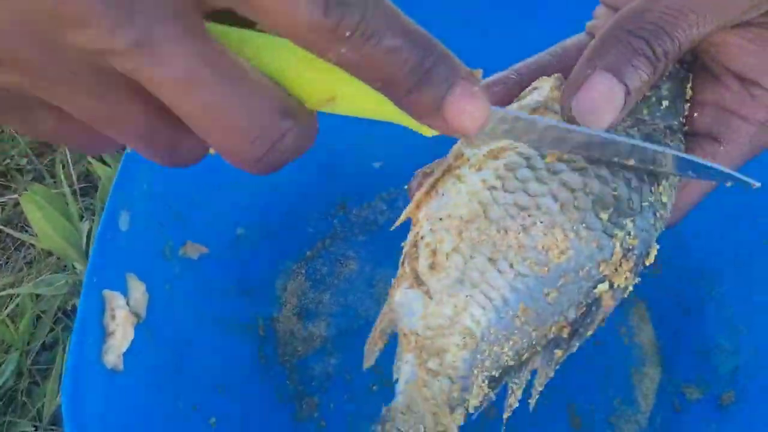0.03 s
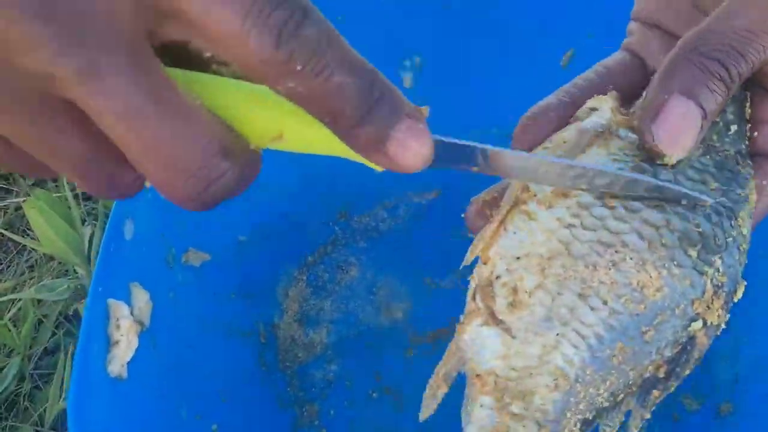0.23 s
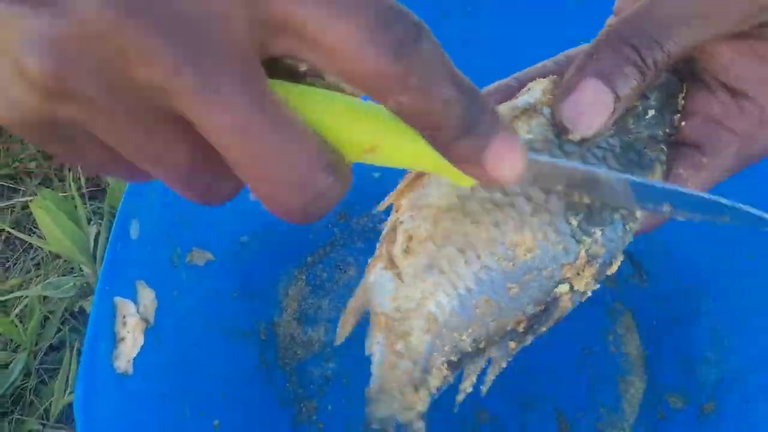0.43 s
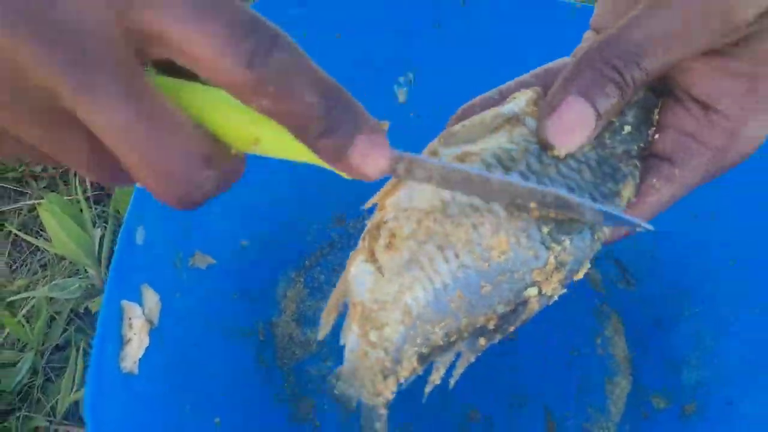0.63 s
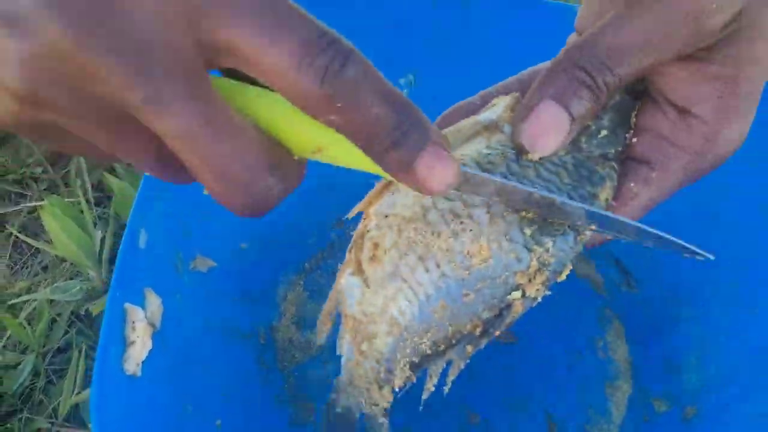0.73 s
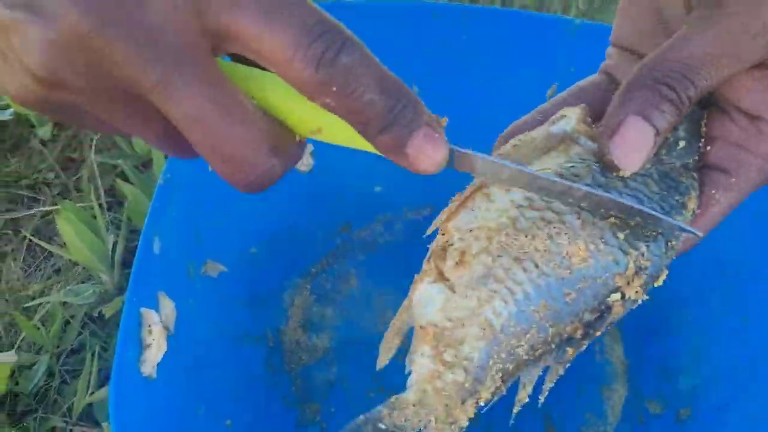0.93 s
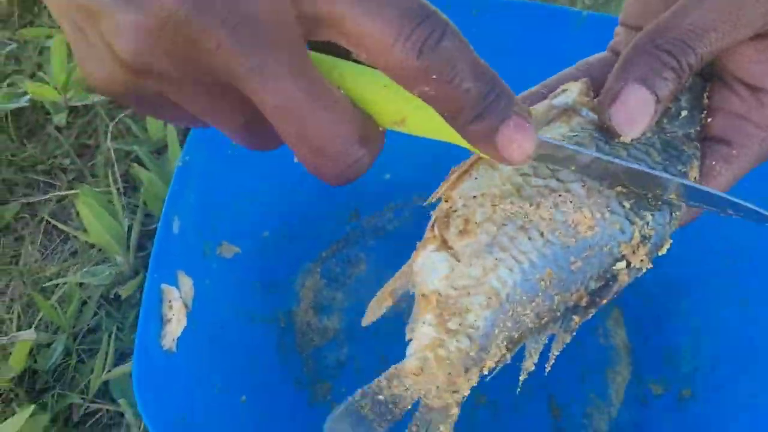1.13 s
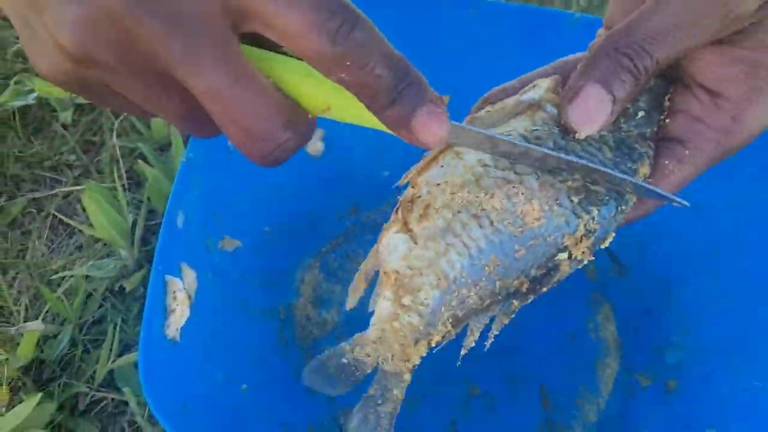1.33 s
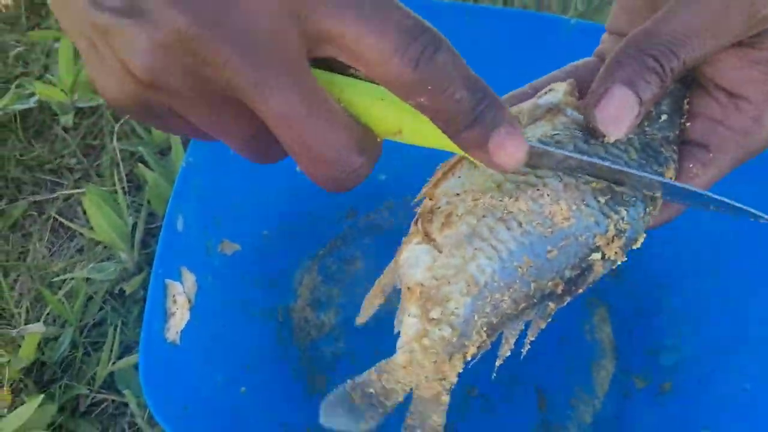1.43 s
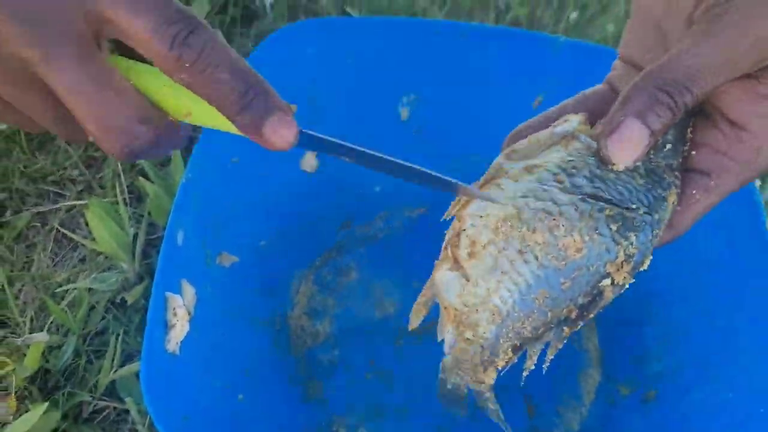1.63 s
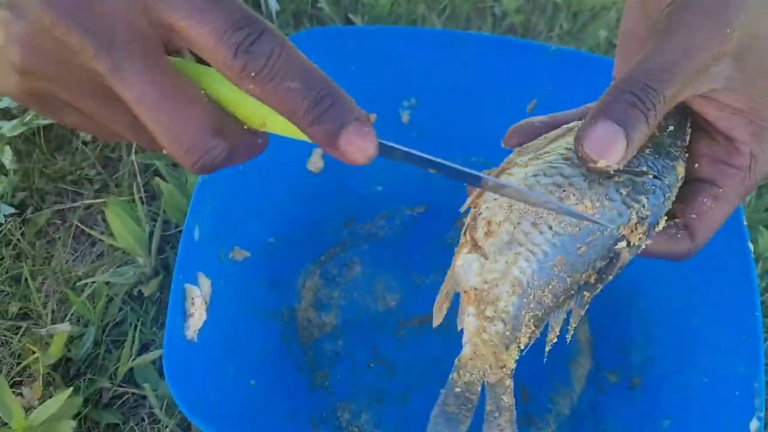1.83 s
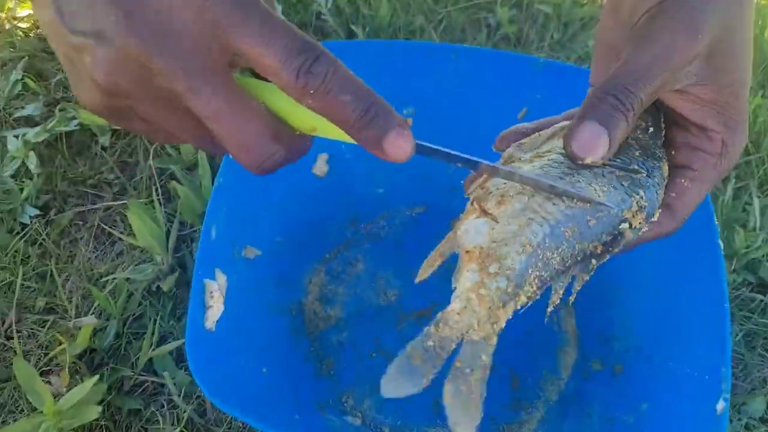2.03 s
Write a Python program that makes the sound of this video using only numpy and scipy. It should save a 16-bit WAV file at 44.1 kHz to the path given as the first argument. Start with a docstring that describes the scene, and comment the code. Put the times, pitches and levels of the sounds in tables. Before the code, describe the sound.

A knife blade scrapes scales from a fish over a plastic bowl, a few light strokes and then firmer, quicker ones, close to the microphone outdoors, with wind thumping low and a faint distant bird.

```python
"""A knife scrapes the scales off a fish held over a plastic bowl outdoors: a few light strokes, then a run of firm ones.
Uneven clicks of the edge drive resonances of fish, blade and bowl: a hollow rasp, a thin steel ring and a fine crackle.
The blade catches now and then, a narrow ring at one pitch, and single scales snap off as short bursts of bright noise.
Close on the microphone, wind buffets its two ports: shaped noise for rumble and flutter, short low swings for thumps.
Behind lie a faint hiss of shaped noise and a far bird, whose chirps are wavering sines."""
import sys
import numpy as np
from scipy import signal
from scipy.fft import rfft, irfft
from scipy.io import wavfile
from scipy.ndimage import uniform_filter1d

SR = 44100
rng = np.random.default_rng(int(sys.argv[2]) if len(sys.argv) > 2 else 0)


def store_pcm(level_fs):
    """Save levels as 16-bit WAV."""
    pcm = np.round(np.clip(level_fs, -1, 1) * 32767).astype(np.int16)
    wavfile.write(sys.argv[1], SR, np.atleast_2d(pcm).T)


N = 91904
TIME = np.arange(N) / SR
BIN_HZ = np.arange(N // 2 + 1) * SR / N
OPPOSITE = np.array([[1], [-1]])  # a part that enters left and right with opposite sign


def from_db(db):
    """Decibels to gain."""
    return 10 ** (np.asarray(db) / 20)


def rms_one(x):
    """Scale to unit power."""
    return x / np.sqrt(np.mean(x ** 2) + 1e-20)


def in_time(rows):
    """The level of a (time, level) curve at every sample."""
    s, level = np.transpose(rows)
    return np.interp(TIME, s, level)


def bump(s, width_s):
    """A smooth Gaussian swell around time s; width_s is its standard deviation."""
    return np.exp(-.5 * ((TIME - s) / width_s) ** 2)


def panned(x, pan_db):
    """Left louder than right by pan_db."""
    return x * from_db(np.array([[.5], [-.5]]) * pan_db)


def spread(x, pans):
    """Left against right by frequency."""
    hz, pan_db = np.transpose(pans)
    return irfft(panned(rfft(x), np.interp(BIN_HZ, hz, pan_db)), N)


def coloured(x, spectrum):
    """Weight a signal by a spectrum drawn over log frequency; unit power."""
    hz, db = np.transpose(spectrum)
    log_bins = np.log(np.maximum(BIN_HZ, 1))
    gain = from_db(np.interp(log_bins, np.log(hz), db))
    return rms_one(irfft(rfft(x) * gain, N))


def drift(rate):
    """Random wander with spread 1, mostly slower than rate [Hz]."""
    return coloured(rng.standard_normal(N), [(rate / 2, 0), (rate, -3), (rate * 10, -60)])


def evened(x, seconds):
    """Hold the short-term power near one."""
    power = x ** 2
    for _ in range(2):
        power = uniform_filter1d(power, max(int(seconds * SR), 2))
    return x / np.sqrt(np.maximum(power, 0) + 1e-9)


def resonance(x, hz, width_hz):
    """Two-pole resonance with gain 1 on top."""
    r = np.exp(-np.pi * width_hz / SR)
    feed = np.array([1, 0, -1]) * (1 - r * r) / 2
    back = [1, -2 * r * np.cos(2 * np.pi * hz / SR), r * r]
    return signal.lfilter(feed, back, x + 1e-18)


def wind():
    """Each port has its own eddies: a deep rumble, and a flutter above it in the harder gusts."""
    # rumble at the left and at the right port, before the trim: (time [s], level [dB])
    left_gusts = [(0.0, -38), (0.15, -28.5), (0.18, -53.5), (0.3, -82), (0.35, -49.5), (0.39, -52.5),
                  (0.46, -29), (0.49, -65), (0.54, -38.5), (0.67, -42), (0.77, -35.5), (0.86, -62),
                  (0.93, -41), (1.03, -29.5), (1.06, -68), (1.12, -27.5), (1.17, -79), (1.32, -61.5),
                  (1.38, -36.5), (1.6, -47.5), (1.7, -78), (1.82, -45), (1.95, -62), (1.98, -35),
                  (2.08, -49)]
    right_gusts = [(0.0, -38), (0.02, -26), (0.1, -42), (0.15, -34), (0.3, -48.5), (0.34, -42.5),
                   (0.39, -71), (0.45, -24), (0.47, -43.5), (0.53, -31.5), (0.58, -39.5), (0.69, -47),
                   (0.76, -30), (0.9, -45), (1.04, -30), (1.07, -42), (1.16, -41.5), (1.32, -49.5),
                   (1.44, -40.5), (1.53, -41.5), (1.72, -58.5), (1.83, -43.5), (1.96, -76), (1.99, -36),
                   (2.08, -48.5)]
    # flutter before it is panned: (time [s], level [dB])
    flutter_level = [(0.0, -34.5), (0.035, -40), (0.07, -49), (0.125, -35.5), (0.155, -38), (0.19, -70),
                     (0.23, -47.5), (0.28, -74), (0.335, -59.5), (0.40, -84), (0.45, -60), (0.497, -45),
                     (0.61, -57.5), (0.625, -45), (0.68, -63.5), (0.81, -42.5), (0.865, -65.5),
                     (1.03, -39.5), (1.07, -50), (1.13, -52), (1.3, -70), (1.39, -55.5), (1.7, -69),
                     (2.08, -63.5)]
    # spectra of rumble and flutter: (frequency [Hz], relative density [dB per Hz])
    rumble_colour = [(15, -28), (30, -8.5), (48, -3.5), (68, 2), (110, -9), (160, -9.5), (230, -39),
                     (500, -62)]
    flutter_colour = [(100, -57), (170, -5.5), (245, 2.5), (320, -3.5), (420, -10.5), (560, -22),
                      (800, -35.5), (1500, -53)]
    rumble_trim_db, rumble_top_hz, flutter_pan_db = -2.5, 197, -1.5
    steady_s = 0.022  # averaging time over which the power is held even

    rumble_db = rumble_trim_db + np.array([in_time(left_gusts), in_time(right_gusts)])
    rumble_noise = coloured(rng.standard_normal((2, N)), rumble_colour)
    rumble = from_db(rumble_db) * evened(rumble_noise, steady_s)
    lowpass = signal.butter(3, rumble_top_hz, fs=SR, output="sos")

    flutter_noise = coloured(rng.standard_normal((2, N)), flutter_colour)
    flutter = from_db(in_time(flutter_level)) * evened(flutter_noise, steady_s)
    return signal.sosfilt(lowpass, rumble) + panned(flutter, flutter_pan_db)


def hiss():
    """Faint outdoor noise, stronger on the right and most so below the top octave; its treble swells softly twice."""
    # spectrum: (frequency [Hz], relative density [dB per Hz])
    hiss_colour = [(100, 3.5), (500, 6), (700, -0.5), (1050, -0.5), (1700, 2), (3000, 1), (5000, 0.5),
                   (7200, 4), (8500, -6), (11000, 1.5), (13500, -2.5), (15500, -4)]
    # level before the balance: (time [s], level [dB])
    hiss_level = [(0.14, -59.5), (0.26, -64.5), (0.6, -62), (2.08, -62.5)]
    # balance: (frequency [Hz], left minus right [dB])
    balance = [(6000, -7.5), (12000, -2)]
    # treble swells: (time [s], standard deviation [s], level [dB])
    shimmers = [(0.588, 0.037, -72), (0.832, 0.074, -67)]
    shimmer_hz, shimmer_width_hz = 11100, 640

    even = from_db(in_time(hiss_level)) * coloured(rng.standard_normal((2, N)), hiss_colour)
    treble = rms_one(resonance(rng.standard_normal((2, N)), shimmer_hz, shimmer_width_hz))
    swells = sum(from_db(db) * bump(s, width_s) for s, width_s, db in shimmers)
    return spread(even, balance) + treble * swells


def thumps():
    """A hard eddy strikes the ports with a short low swing, not quite in step on the two sides."""
    # before the lowpass: (time [s], envelope peak [dB], frequency [Hz], left minus right [dB])
    eddies = [(0.005, -30.5, 159, -2.5), (0.030, -26, 241, -2), (0.117, -24.5, 83.4, -7),
              (0.493, -41, 322, 0), (0.626, -27, 69, -5), (0.798, -33, 73, -15), (0.818, -27, 80, -7.5),
              (1.018, -27, 251.5, -2.5), (1.099, -27.5, 63, -12), (1.917, -28, 82.5, 4)]
    rise_s, top_hz = 0.005, 630
    out = np.zeros((2, N))
    for s, db, hz, pan_db in eddies:
        age = np.maximum(TIME - s, 0)
        phase_lag = np.array([[0], [rng.uniform(1, 1.72)]])  # radians, left and right
        swing = np.sin(2 * np.pi * hz * age - phase_lag)
        envelope = age / rise_s * np.exp(1 - age / rise_s)
        out += panned(from_db(db) * swing * envelope, pan_db)
    return signal.sosfilt(signal.butter(2, top_hz, fs=SR, output="sos"), out)


def bird():
    """Faint far chirps, sines that sag in pitch: one thin, the others roughened by a fast waver."""
    # (time [s], standard deviation [s], pitch [Hz], waver [share of pitch], level [dB])
    chirps = [(0.046, 0.012, 2855, 0.083, -62.5), (0.343, 0.025, 4205, 0.0134, -70.5),
              (0.685, 0.011, 2910, .1, -64.5), (1.256, 0.0053, 2750, .06, -60)]
    fall_hz, waver_hz = 50, 260  # fall per standard deviation of time; rate of the waver
    out = 0
    for s, width_s, hz, waver, db in chirps:
        sag = fall_hz * np.clip((TIME - s) / width_s, -2, 2)
        pitch = hz * (1 + waver * drift(waver_hz)) - sag
        out = out + from_db(db) * bump(s, width_s) * np.sin(2 * np.pi * np.cumsum(pitch) / SR)
    return out


def scale_clicks():
    """The edge flicks over scale after scale: dense uneven clicks over smooth friction."""
    scales_per_s, spread_db = 1000, 2.6
    click_share = 0.7  # of the power; the rest is friction
    sizes = from_db(spread_db * np.minimum(rng.exponential(1, N), 4)) * rng.choice([-1, 1], N)
    clicks = rms_one(sizes * (rng.random(N) < scales_per_s / SR))
    friction = rng.standard_normal(N)
    return np.sqrt(click_share) * clicks + np.sqrt(1 - click_share) * friction


def ridges():
    """The edge drops off each row of scales with a jolt that fades until the next row; unit power."""
    rows_per_s, uneven_db, jolt_db = 95, 4, 8
    rows = np.cumsum(rows_per_s * from_db(uneven_db * drift(rows_per_s))) / SR
    return rms_one(from_db(-jolt_db * (rows % 1)))


def body(force, deep_db):
    """The hollow ring that the blade excites, its power held even; deep_db lifts the low resonances."""
    # resonances of fish, blade and bowl: (frequency [Hz], width [Hz], gain before the deep lift [dB])
    hollows = [(590, 78, -10), (700, 52, -15), (846, 61, -7), (984.5, 117, 3.5), (1075, 118, 1),
               (1282, 148, 0.5), (1220, 600, -7.5)]
    deep_below_hz, low_hz, high_hz = 950, 440, 2500
    rings = 0
    for k, (hz, width_hz, db) in enumerate(hollows):
        gain = from_db(db + deep_db * (hz < deep_below_hz))
        rings = rings + (-1) ** k * gain * resonance(force, hz, width_hz)  # alternating sign
    band = signal.butter(2, [low_hz, high_hz], "band", fs=SR, output="sos")
    return evened(signal.sosfilt(band, rings), 0.023)


def from_bowl(ring):
    """The hollow ring comes from one side: it reaches the right port a little later."""
    pan_db, right_lag_s = -0.5, 0.00013
    left, right = panned(ring, pan_db)
    return np.array([left, np.interp(TIME - right_lag_s, TIME, right)])


def scraping():
    """Each stroke bites, swells or eases, and lets go; its clicks drive the hollow rasp, steel ring and crackle."""
    # knife strokes: (start [s], length [s], rasp at the end of the stroke [dB],
    # crackle at the end [dB], swell over the stroke [dB], lift of the deep resonances [dB])
    strokes = [(0.108, 0.044, -57.5, -58.5, 10, -6), (0.313, 0.11, -76.5, -92, -8.5, 4.5),
               (0.451, 0.13, -56.5, -61, 4.5, 5.5), (0.656, 0.099, -67, -78, 2, 18),
               (0.805, 0.097, -66, -69.5, -6, 6), (0.996, 0.082, -60.5, -72.5, 9.5, -9),
               (1.152, 0.079, -52.5, -57.5, 3, -8), (1.307, 0.036, -56.5, -77, 2.5, 0),
               (1.333, 0.046, -53.5, -55.5, 4, 6.5), (1.428, 0.075, -44, -47.5, 11.5, -1),
               (1.506, 0.014, -53, -56, 0, 16), (1.586, 0.058, -50.5, -57.5, -0.5, 5),
               (1.662, 0.077, -55.5, -58.5, 0, 10.5)]
    # thin ring of the steel blade: (frequency [Hz], width [Hz], level relative to the rasp [dB])
    blade = [(3330, 380, -15.5), (4110, 200, -17), (5600, 120, -24)]
    # crackle of the scales: (frequency [Hz], relative density [dB per Hz])
    crackle_colour = [(500, -64), (1500, 0.5), (2300, -2.5), (3400, -1), (4100, 1), (4700, -5),
                      (5600, -3.5), (7300, -4.5), (8600, -11), (10500, -4.5), (12200, -4.5), (15500, -14.5)]
    likeness = 0.25  # correlation of the crackle's drive between left and right
    side_db = -17  # opposite-signed part of the push
    attack_s, release_s = 0.006, 0.014

    force, aside, chatter = scale_clicks(), scale_clicks(), ridges()
    edge = np.sqrt(1 + likeness) * force + np.sqrt(1 - likeness) * aside * OPPOSITE
    grit = coloured(edge, crackle_colour)
    push = force + from_db(side_db) * aside * OPPOSITE
    steel = sum(from_db(db) * rms_one(resonance(push, hz, width_hz)) for hz, width_hz, db in blade)

    rasp, crackle = 0, 0
    for start, length, rasp_db, crackle_db, swell_db, deep_db in strokes:
        age = TIME - start
        bite = np.clip(age / attack_s, 0, 1)
        let_go = np.exp(-np.maximum(age - length, 0) / release_s)
        swell = from_db(swell_db * (np.clip(age / length, 0, 1) - 1))
        pressure = bite * let_go * chatter * swell
        rasp = rasp + from_db(rasp_db) * pressure * (body(push, deep_db) + steel)
        crackle = crackle + from_db(crackle_db) * pressure * grit
    return from_bowl(rasp) + crackle


def catches():
    """The edge hooks under a row of scales and judders briefly at one pitch."""
    # before it is panned: (time [s], level [dB], frequency [Hz], standard deviation [s])
    hooks = [(0.458, -57.5, 1070, .004), (0.832, -50, 831, 0.0076), (1.204, -40.5, 1019, 0.0052),
             (1.344, -48, 1014, 0.0034), (1.381, -49, 1270, 0.0013), (1.488, -41, 1124, 0.0027),
             (1.504, -36.5, 1015, 0.0024), (1.72, -56.5, 597, 0.011)]
    ring_width_hz = 70
    force, out = scale_clicks(), 0
    for s, db, hz, width_s in hooks:
        ring = resonance(resonance(force, hz, ring_width_hz), hz, ring_width_hz)
        out = out + from_db(db) * bump(s, width_s) * evened(ring, width_s)
    return from_bowl(out)


def snaps():
    """A scale tears loose with a tiny bright tick: a decaying noise burst through one broad resonance."""
    # (time [s], peak before it is panned [dB], frequency [Hz], width [Hz], left minus right [dB])
    torn_scales = [(0.9580, -46, 12000, 4500, -9), (0.9769, -42, 7700, 2480, -2),
                   (1.379, -41.5, 3520, 9100, 4), (1.6020, -34.5, 12300, 3000, 4),
                   (1.8730, -46.5, 2500, 7300, -9)]
    decay_s = 0.0013
    out = np.zeros((2, N))
    for s, db, hz, width_hz, pan_db in torn_scales:
        fade = (TIME >= s) * np.exp(-np.abs(TIME - s) / decay_s)
        tick = resonance(rng.standard_normal((2, N)) * fade, hz, width_hz)
        tick = tick / np.abs(tick).max(axis=1, keepdims=True)
        out += panned(from_db(db) * tick, pan_db)
    return out


def scene():
    """Knife and fish close by, wind on the microphone, a bird far off."""
    outdoors = wind() + hiss() + thumps() + bird()
    knife = scraping() + catches() + snaps()
    return outdoors + knife


def record(dry):
    """A steep lowpass cuts the top off above 15.6 kHz."""
    return signal.sosfilt(signal.ellip(10, .1, 70, 15600, fs=SR, output="sos"), dry)


dry = scene()
out = record(dry)
store_pcm(out)
```